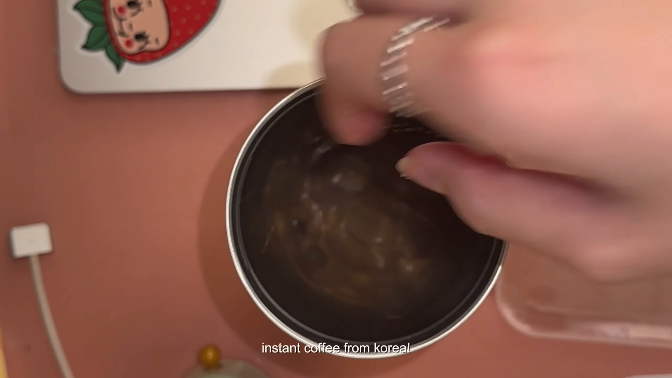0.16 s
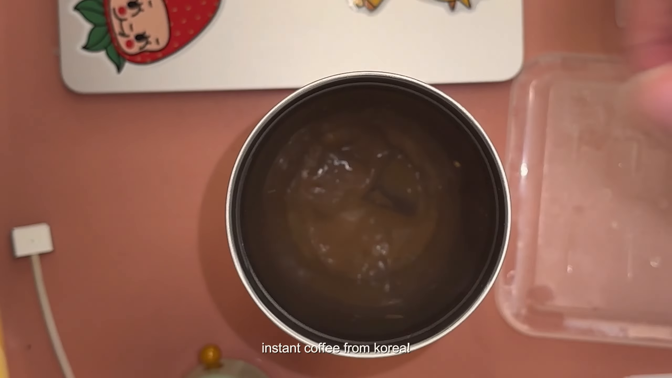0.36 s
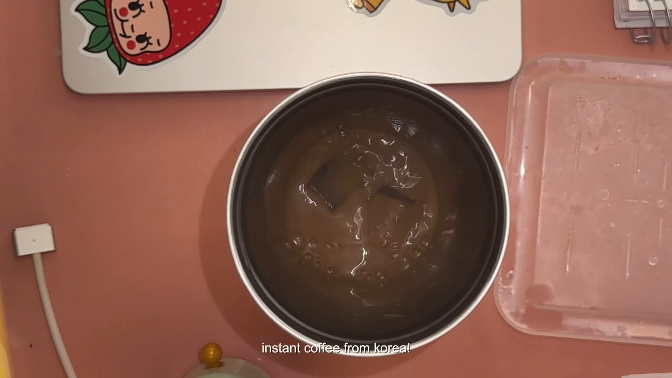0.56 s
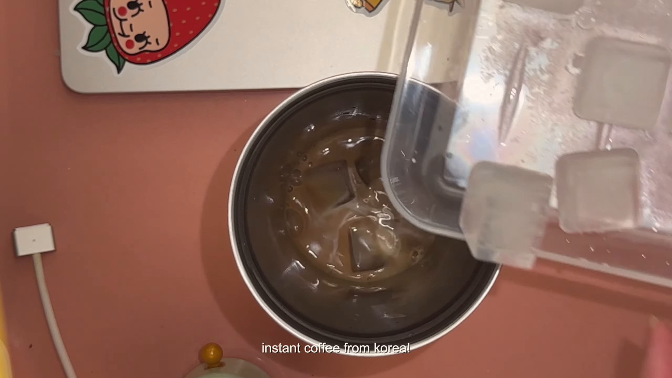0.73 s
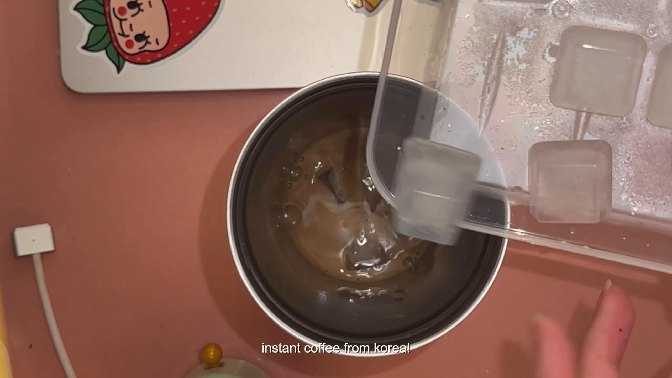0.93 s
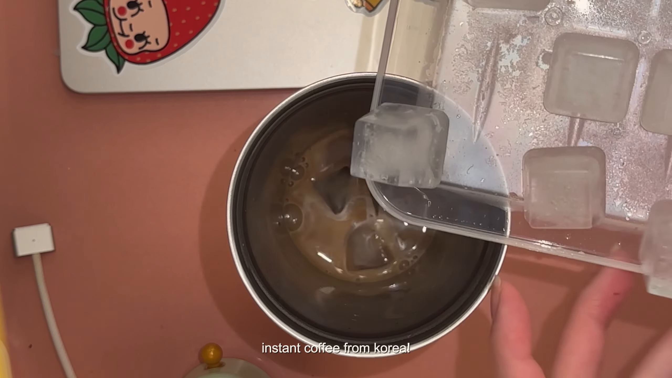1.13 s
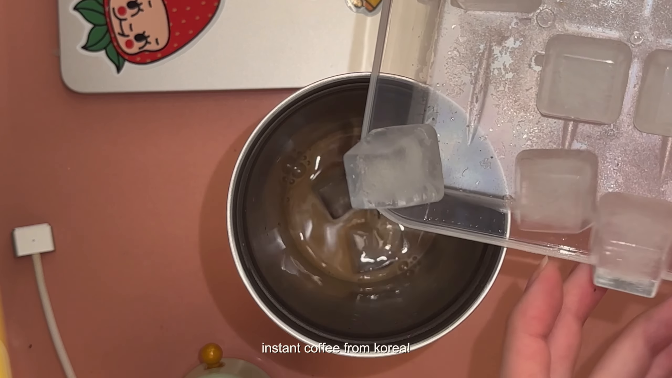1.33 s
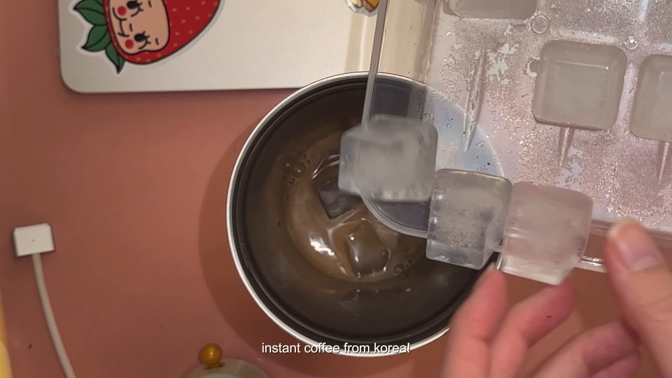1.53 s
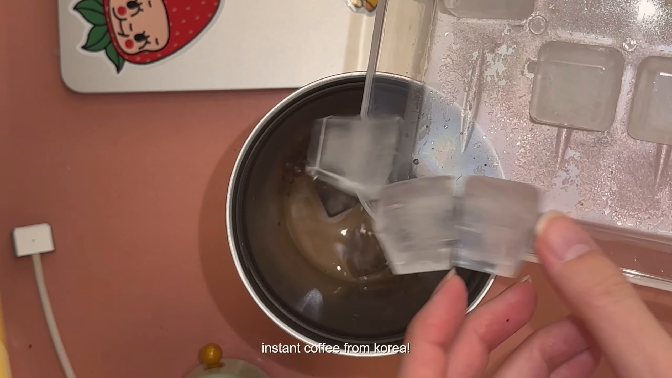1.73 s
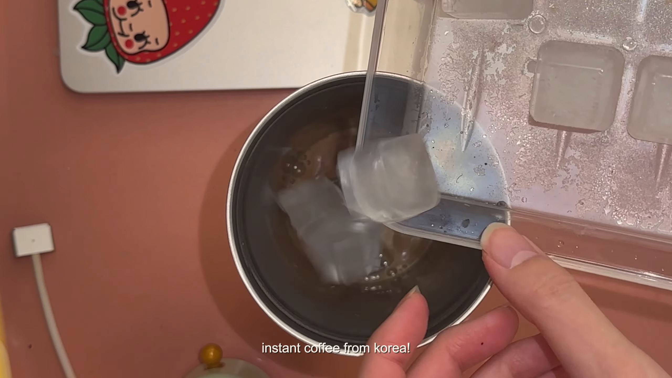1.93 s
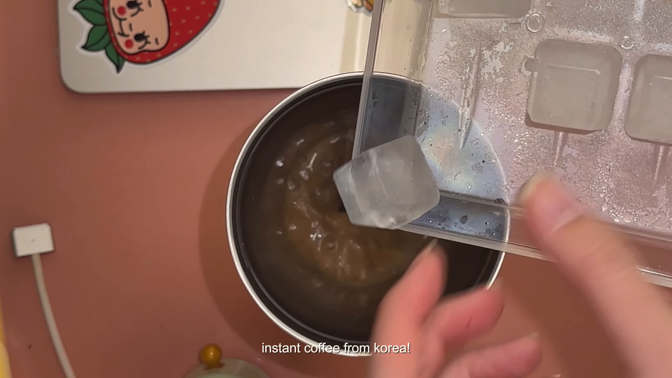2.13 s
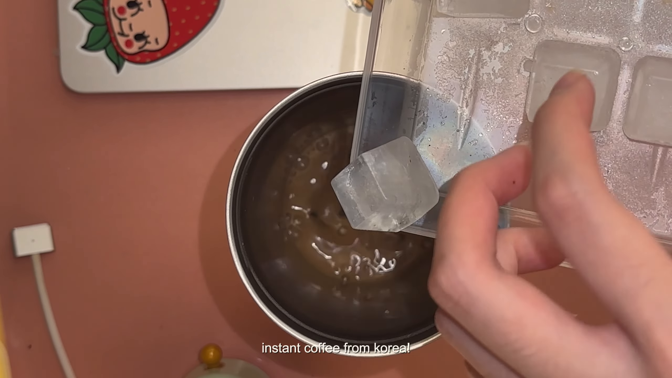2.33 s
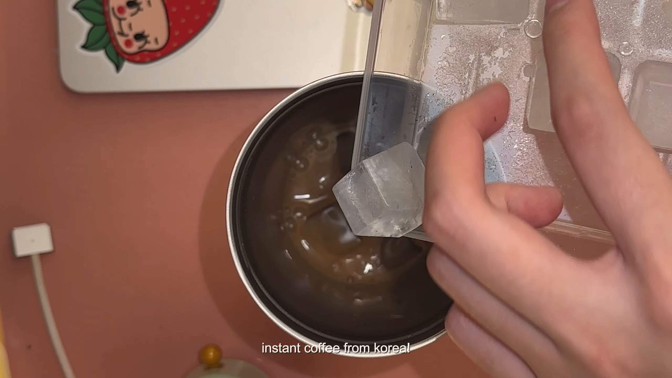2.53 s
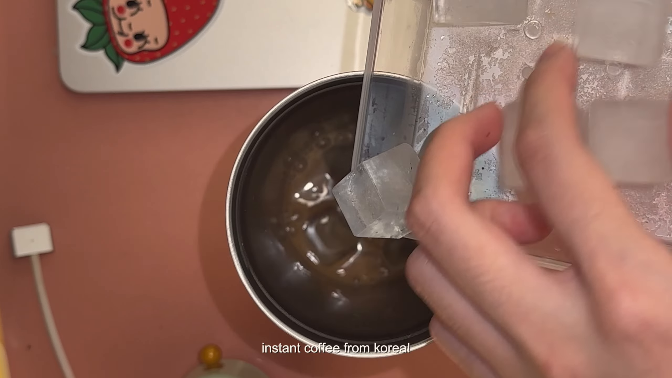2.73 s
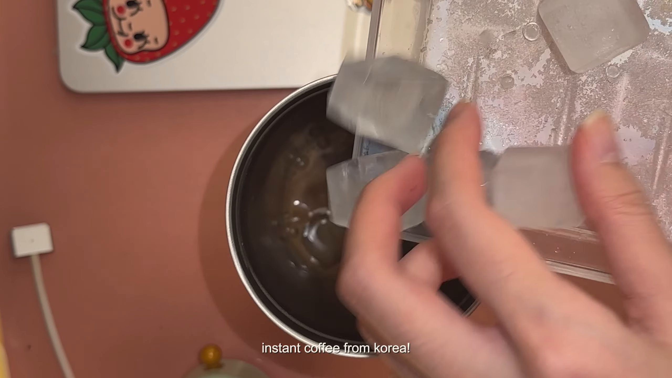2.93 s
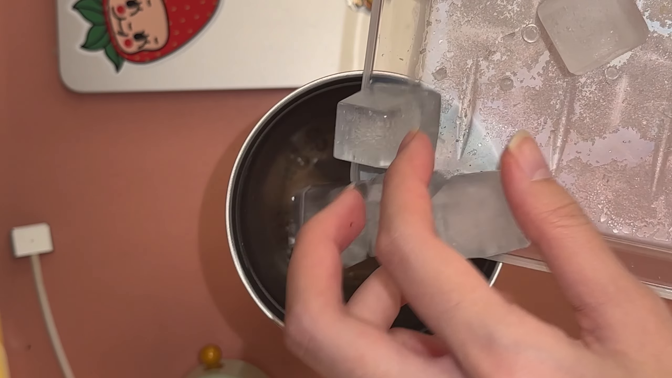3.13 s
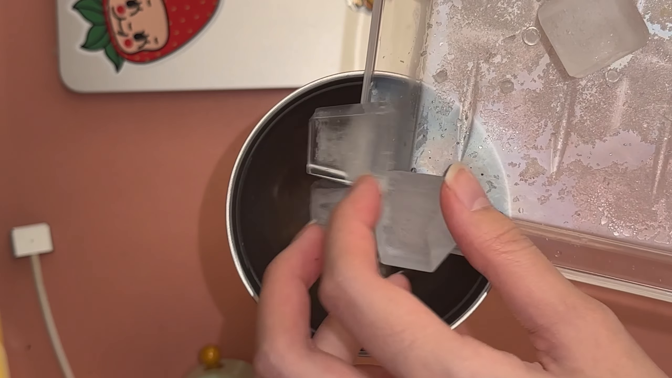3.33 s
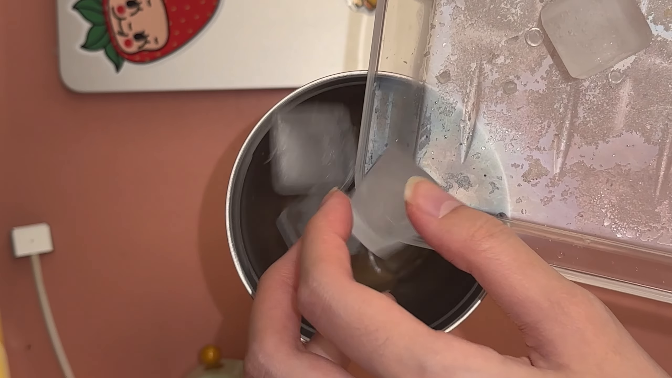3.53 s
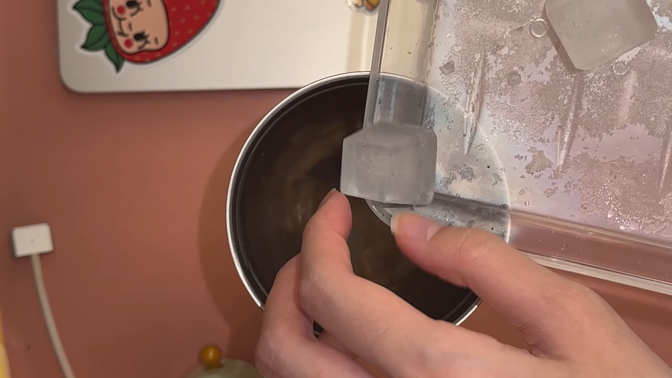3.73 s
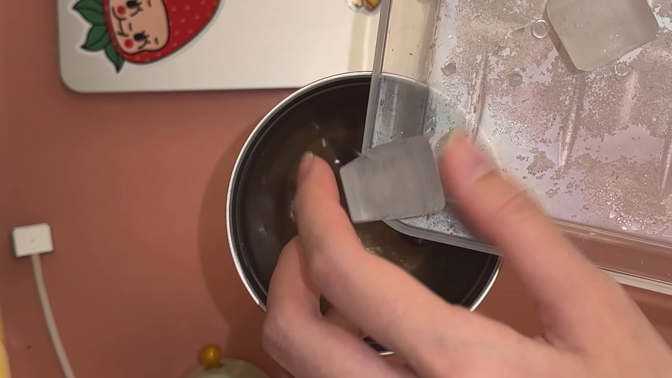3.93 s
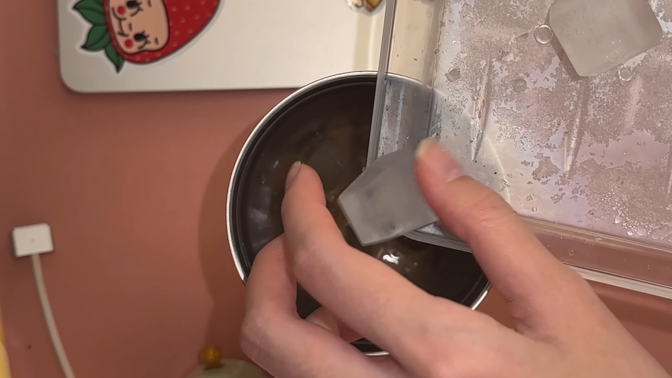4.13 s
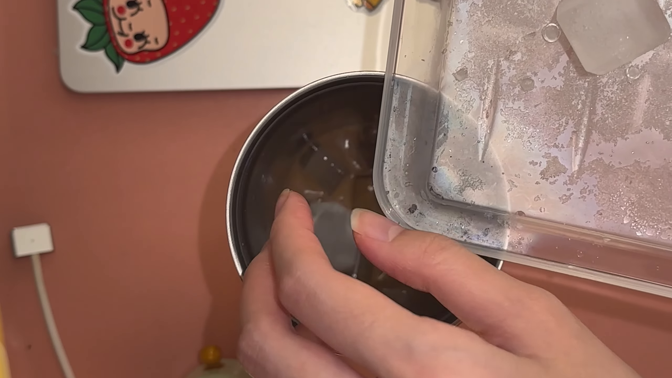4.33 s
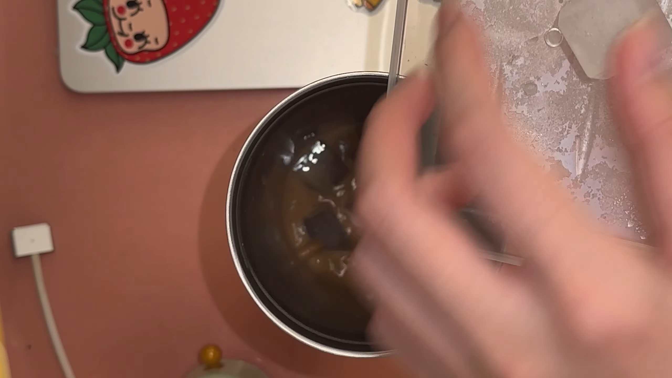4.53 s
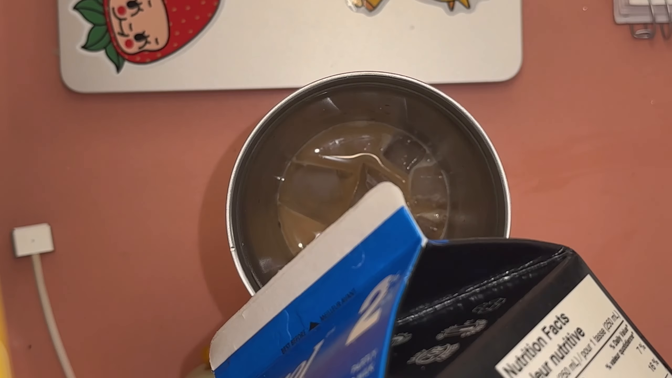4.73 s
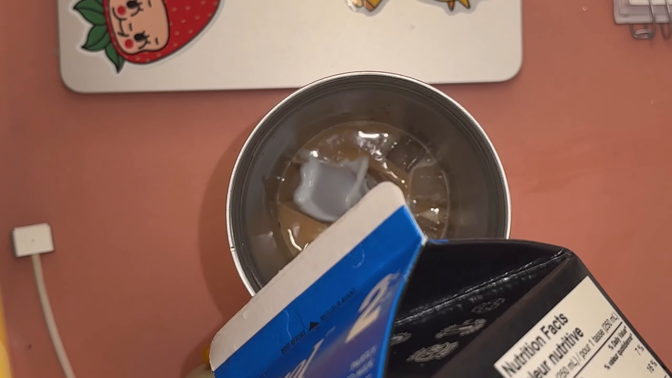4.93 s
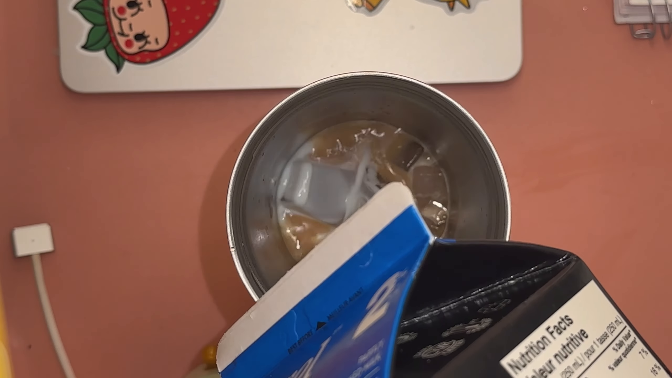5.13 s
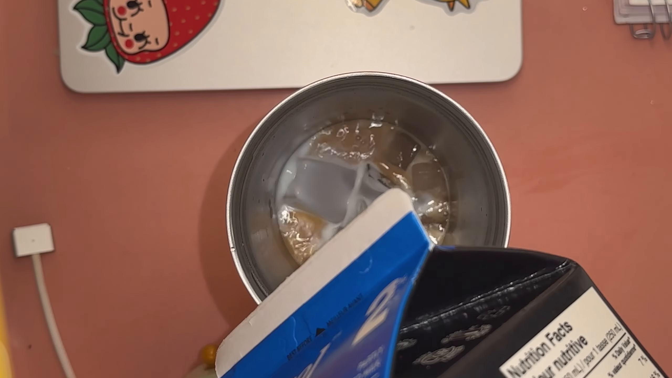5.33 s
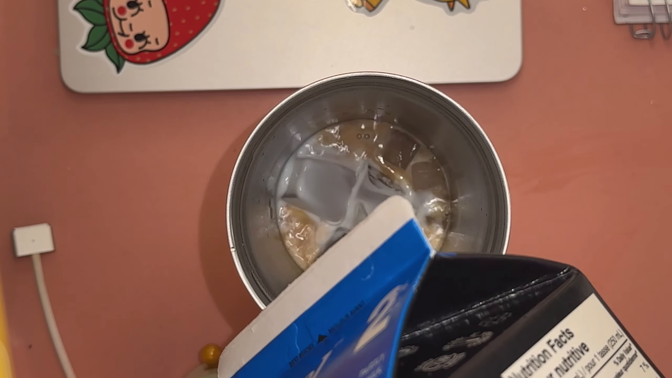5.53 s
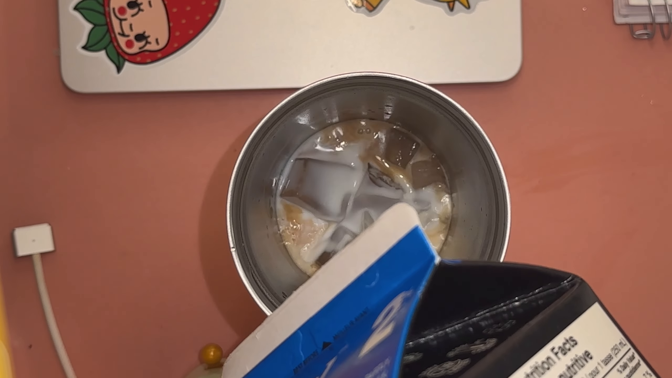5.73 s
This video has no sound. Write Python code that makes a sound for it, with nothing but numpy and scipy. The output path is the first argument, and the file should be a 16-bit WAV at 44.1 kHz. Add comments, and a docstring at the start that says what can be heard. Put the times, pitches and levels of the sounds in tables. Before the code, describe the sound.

Ice cubes knock and scrape in a plastic tray, then plop and clink into coffee in a metal cup before milk quietly runs in.

```python
"""In a small kitchen, close up, ice cubes slide and knock in a plastic tray and plop into coffee in a metal cup.
Bursts of filtered noise make the knocks and cracks; fading sine waves make the cup ring.
Trapped air sings in short gliding notes, and rough noise through resonances makes the ice scrape.
A finger pushes the ice for a while. Later milk runs in quietly as low, uneven noise.
Now and then the warming ice ticks, and a low mains hum lies beneath it all."""
import sys
import numpy as np
from scipy import signal
from scipy.fft import rfft, irfft, next_fast_len
from scipy.io import wavfile
from scipy.ndimage import map_coordinates

SR = 44100
rng = np.random.default_rng(int(sys.argv[2]) if len(sys.argv) > 2 else 0)


def transcribe(u):
    """Save the signal u as a 16-bit wav file named by the first command-line argument.

    u: samples, shape (n,) or (channels, n), limited to [-1, 1]; the rate is SR.
    q: integer samples, one column per channel.
    """
    v = np.clip(np.atleast_2d(u).T, -1, 1)
    q = np.round(v * 32767).astype(np.int16)
    wavfile.write(sys.argv[1], SR, q)


N = 254898
TIME = np.arange(N) / SR

# All levels are starting points: the functions add their own trims.
# cubes knocking in the tray: (time [s], level [dB], treble against it [dB], bass against it [dB])
TRAY_KNOCKS = [(0.803, -22, -10, -13.5), (0.808, -28.5, -30.5, -6.5), (0.834, -31.5, -14, -13.5),
               (0.863, -38, -15, -22), (0.966, -29.5, -11, -14.5), (0.979, -36, -17, -25),
               (1.004, -37, -14, -17), (1.021, -36, -16.5, -10), (1.097, -40.5, -27, -24),
               (1.122, -44.5, -10.5, -34), (1.239, -41, -10.5, -8.5), (1.322, -33.5, -17.5, -20.5),
               (1.368, -39, -13.5, -26), (1.408, -32.5, -22, -31), (1.436, -26, -14.5, -20),
               (1.46, -23, -9, -18.5), (1.482, -31.5, -15, -19), (1.503, -21, -12, -21.5),
               (1.537, -28, -15.5, -12), (1.561, -34.5, -14, -24), (1.634, -32, -12, -27),
               (1.675, -29, -14.5, -12), (1.71, -26.5, -11.5, -12), (1.72, -23, -12.5, -11.5),
               (1.754, -29, -13, -11.5), (2.446, -56, -16, -13), (2.481, -33.5, -8.5, -14),
               (2.851, -31.5, -8.5, -15.5), (2.871, -19, -13, -16.5), (2.919, -24, -10, -11.5),
               (2.949, -18.5, -17, -20), (2.972, -35, -6, -25), (3.026, -20.5, -11.5, -19),
               (3.096, -33, -13, -22), (3.575, -26, -34, -18), (3.855, -27, -19, -14.5),
               (3.873, -31, -9.5, -21), (3.929, -24.5, -12.5, -18.5), (4.194, -33.5, 6, -19)]
# cubes striking the cup and floating ice:
# (time [s], level [dB], treble against it [dB], pitch [Hz], ring against it [dB])
CUP_CLINKS = [(0.0144, -31, -40, 2440, -12.5), (0.0423, -32.5, -15, 1390, -14.5),
              (0.1094, -38, -5, 1780, -5), (0.135, -23.5, -10, 1720, -9), (0.1404, -14, -22, 1950, -18),
              (0.1564, -19.5, -54, 1460, -13.5), (0.3267, -35.5, -22.5, 1480, -9),
              (0.3576, -29.5, -26, 1417, -10), (1.7948, -16.5, -13.5, 1640, -10),
              (1.9415, -17.5, -14, 1520, -10.5), (1.9709, -14, -10, 1750, -14.5),
              (2.0014, -17, -12.5, 1520, -7), (2.0198, -23, -21, 1570, -39.5), (2.0916, -33, -30, 1210, 1),
              (2.1904, -29, -22.5, 1612, -10), (2.2573, -30, -16, 2530, -11),
              (3.2266, -32.5, -31, 1670, 5.5), (3.3054, -14, -15, 3750, -13.5),
              (3.3318, -20.5, -13, 2400, -10), (3.3874, -30.5, -10.5, 1610, -17),
              (3.4401, -30.5, -19.5, 2660, -5), (3.4795, -33, -17, 1767, -4), (3.5354, -16, -16, 2330, -10),
              (3.6386, -15.5, -13, 3600, -12.5), (3.6681, -14.5, -13, 2800, -16.5),
              (3.69, -14, -11.5, 2630, -8.5), (3.7888, -29, -17.5, 1660, -6.5),
              (4.0482, -38, -15, 3060, -20.5), (4.2966, -33, -14, 1560, -5.5),
              (4.348, -16, -9.5, 3020, -12.5), (4.3674, -20.5, -17, 2970, -34),
              (4.3954, -23.5, -19.5, 2920, -9), (4.4717, -35.5, -22, 3220, -5.5),
              (4.4884, -36, -34, 1600, -9.5), (4.6059, -38, -31, 3070, -12),
              (4.6294, -38.5, -17.5, 3050, -24)]
# ice splitting as it warms: (time [s], level [dB], pitch [Hz])
ICE_TICKS = [(0.692, -52.5, 10020), (4.197, -19.5, 6740), (4.736, -52, 10400), (4.774, -46, 6680),
             (5.1991, -29, 5070), (5.465, -47.5, 5240), (5.5175, -37.5, 10900), (5.6097, -38, 3480)]
# soft thuds through the table as cubes land: (time [s], peak [dB])
TABLE_THUDS = [(0.816, -46), (0.976, -52.5), (1.804, -47), (1.964, -38), (2.891, -44.5), (3.311, -48),
               (3.548, -51), (3.691, -44), (4.378, -50.5)]
# small blips of the milk stream: (time [s], level [dB])
MILK_BLIPS = [(5.033, -39.5), (5.222, -38.5), (5.432, -40.5)]
# ringing notes of the cup's wall when empty: (pitch [Hz], level [dB], time to fall 60 dB [s])
CUP_MODES = [(708, -6.5, 1), (794, -7.5, 0.96), (1082, -4, 0.36), (1111, -15.5, 1), (1497, -11, 0.13),
             (1580, -6.5, 0.53), (1687, 7, 0.19), (1884, -2.5, 0.28), (2220, -13.5, 0.29),
             (2317, 4.5, 0.19), (2380, -16.5, 0.13), (2730, -3, 0.19), (2826, -2, 0.12), (3140, -13, 0.25),
             (3630, -9, 0.2), (3800, -17, 0.24), (4480, 3, 0.085), (4830, -26, 0.34), (6100, -22, .26),
             (6800, -26.5, 0.14)]
# resonances of the tray: (pitch [Hz], width [Hz], level [dB])
TRAY_MODES = [(398, 42.8, -14), (1104, 150, 23), (1600, 830, 16), (2860, 620, 19), (4040, 80, -24.5),
              (5210, 108, -50), (5950, 100, -1.5), (7600, 314, 8.5)]
# colour of a knock on plastic: (frequency [Hz], relative level [dB])
PLASTIC_COLOUR = [(88, -38), (150, -20.5), (494, -5), (545, -2.5), (774, -6), (1080, -2), (1450, -1.5),
                  (1600, 2.5), (2360, -5), (2760, -1), (3550, -8.5), (8400, -17.5), (16000, -28.5)]
# colour of an ice crack: (frequency [Hz], relative level [dB])
ICE_COLOUR = [(280, -43.5), (480, -8.5), (644, 6), (985, -18), (1770, -6), (2080, -23), (2270, -11),
              (2750, -6), (3000, -7), (10600, -23), (16000, -39.5)]
# colour of frosty scraping: (frequency [Hz], relative level [dB])
GRIT_COLOUR = [(350, -56.5), (600, -42.5), (688, 5), (812, -10.5), (1080, 8.5), (1510, -10.5),
               (2680, -11.5), (4400, -12), (5950, -11.5), (6550, -11.5), (10500, -15), (14500, -22),
               (16000, -27)]
# colour of the flexing tray: (frequency [Hz], relative level [dB])
FLEX_COLOUR = [(76, -66.5), (130, -28), (205, -8), (247, -13.5), (387, 5), (591, -13), (700, -18.5),
               (910, -23), (1540, -120)]
# colour of the still room air: (frequency [Hz], relative level [dB])
STILL_AIR_COLOUR = [(15, -26.5), (25, -31), (74, -4.5), (489, -26.5), (641, -23), (775, -25), (863, -34),
                    (1100, -18.5), (1230, -40.5), (1520, -23), (2050, -29), (10100, -37.5), (16000, -76.5)]
# colour of the milk's hiss: (frequency [Hz], relative level [dB])
STREAM_COLOUR = [(180, -37), (300, 0.5), (412, -17), (470, -13.5), (856, -25), (961, -21.5), (1120, -22),
                 (1660, -18.5), (2400, -20), (2930, -13), (4370, -15.5), (5430, -16.5), (16000, -57)]
# colour of the milk's low churning: (frequency [Hz], relative level [dB])
RUMBLE_COLOUR = [(40, -32), (75, -3), (105, 8), (145, 2.5), (190, -8), (280, -13.5), (450, -33), (900, -62)]
# dull bump of a landing cube: (frequency [Hz], relative level [dB])
BUMP_COLOUR = [(70, -23.5), (150, 4.5), (230, -4.5), (450, -8.5), (900, -33.5)]
# cubes sliding on their own, one list per slide: (time [s], scraping [dB], tray body [dB])
SLIDES = [
    [(0.82, -77, -73), (0.848, -64.5, -84), (0.928, -74.5, -72), (0.966, -62.5, -68), (1.082, -67, -69.5),
     (1.17, -94, -88)],
    [(1.2, -69.5, -78), (1.34, -72.5, -83), (1.524, -68.5, -81), (1.648, -70, -69.5), (1.878, -51, -54.5),
     (1.94, -60, -69)],
    [(2.87, -77, -68), (2.964, -70, -66), (3.1, -74, -68)],
    [(3.1, -60.5, -62), (3.206, -50.5, -51), (3.334, -60.5, -76.5), (3.5, -76, -72)],
    [(3.53, -52, -53), (3.62, -62, -62), (3.748, -57.5, -67), (3.8, -71, -71)],
    [(3.8, -77, -71), (3.844, -65.5, -62), (3.96, -69, -57), (4.002, -77.5, -83), (4.214, -66.5, -69),
     (4.28, -84, -73.5)],
]
# cubes pushed by a finger, one list per push: (time [s], scraping [dB], tray body [dB])
PUSHES = [
    [(2.31, -70, -45), (2.316, -46.5, -60), (2.348, -56.5, -41), (2.368, -56, -58), (2.398, -56, -49.5),
     (2.42, -70, -71)],
    [(2.445, -52, -50), (2.479, -51.5, -49), (2.597, -57, -62.5), (2.635, -44.5, -51), (2.693, -44, -49),
     (2.845, -54.5, -61.5)],
]
# milk running in: (time [s], churning [dB])
POUR = [(4.66, -48.5), (4.74, -58), (4.784, -52), (5.192, -58), (5.22, -54), (5.78, -62.5)]
# mains hum: (time [s], level [dB])
HUM = [(0, -54.5), (0.25, -73), (0.4, -64), (4.62, -64), (4.66, -52.5), (5.78, -52.5)]
# how long the room answers: (frequency [Hz], time to fall 60 dB [s])
ROOM_DECAY = [(200, 0.38), (1200, 0.28), (5000, 0.19), (14000, 0.21)]
# edges of the bass, body, treble and air bands: (frequency [Hz])
BAND_EDGES_HZ = [150, 1000, 4000, 9000, 17000]
# how full the cup is: (time [s], fill [0-1])
FILL = [(1.9, 0.15), (2.0, 0.64), (3.25, 0.58), (3.35, 1), (4.35, 0.88)]
# hollows that plunging cubes open in the drink: (time [s], start pitch [Hz], level [dB])
GULPS = [(0.141, 750, -19.5), (1.939, 633, -22), (2.001, 575, -28), (3.306, 630, -31), (3.643, 616.6, -30),
         (4.344, 587, -24)]
# short gliding notes of trapped air, and first one brief low ring of the cup:
# (time [s], start pitch [Hz], pitch ratio over one glide [x], level [dB])
GLIDING_NOTES = [(0.014, 728, 0.89, -37), (0.04, 1235, 1.3, -44.5), (0.12, 770, 1.2, -33.5),
                 (0.146, 1140, 1.39, -23), (0.161, 1494, 1.084, -17), (0.358, 1388, 1.14, -38),
                 (1.975, 1833, 0.94, -23), (2.014, 1597, .91, -25), (2.084, 1082, 1.5, -37.5),
                 (3.343, 1526, 1.18, -33), (3.712, 1470, 1.21, -32)]
# brief hum of the tray's wall: (pitch [Hz], level against the knock [dB], time to fall 60 dB [s])
WALL_NOTE = (1075, -11.5, 0.055)

# a cube lands on a corner, then tips more softly onto its face: (delay [s], level change [dB])
TIP_IN_TRAY, TIP_IN_CUP = (0.0062, -17.5), (0.011, -13.5)
GULP_GLIDE, SPRAY_GLIDE = 1.04, 1.25  # pitch ratio over one glide
SPRAY_CYCLES = 31  # glide time of a tiny bubble, in cycles of its start pitch
# a cube bobs back up: delay [s], pitch ratio, level against the plunge [dB], extra in a full cup [dB]
BOB_S, BOB_PITCH, BOB_DB, BOB_FULL_DB = 0.082, 0.96, -29.5, 13.5
AIR_GLIDE_S, AIR_GLIDE_FULL_S = 0.016, 0.042  # glide time of a note, and extra in a full cup
SLIDE_DB, PUSH_DB = 7, 8  # trim of the scraping
SLIDE_FLEX_DB, PUSH_FLEX_DB = 2.5, 1  # trim of the tray body
TOP_HZ = 16200


def amp(db):
    """Turn decibels into a gain."""
    return 10 ** (np.asarray(db) / 20)


def unit(x):
    """Scale a sound to an average (rms) strength of 1."""
    return x / np.sqrt(np.mean(x ** 2) + 1e-20)


def along(points, hz):
    """Read (Hz, value) points on a log frequency axis."""
    f, v = np.transpose(points)
    return np.interp(np.log(hz + 1), np.log(f + 1), v)


def curves(rows):
    """Draw lines through each column after the time, one value per sample."""
    s, *cols = np.transpose(rows)
    return [np.interp(TIME, s, c) for c in cols]


def between(start, end, fade):
    """Open a gate from start to end, with soft edges outside."""
    return np.clip(np.minimum(TIME - start, end - TIME) / fade + 1, 0, 1)


def wobble(rate, size=N):
    """Draw a smooth random curve through rate random points a second."""
    points = rng.standard_normal(int(size * rate / SR) + 4)
    return map_coordinates(points, [np.arange(size) * rate / SR])


def filtered(x, response):
    """Filter x by a gain that depends on frequency."""
    m = next_fast_len(len(x) + 4096)
    hz = np.fft.rfftfreq(m, 1 / SR)
    return irfft(rfft(x, m) * response(hz), m)[:len(x)]


def noise(spectrum, size=N):
    """Make coloured noise of rms 1."""
    return unit(filtered(rng.standard_normal(size), lambda hz: amp(along(spectrum, hz))))


def add(track, s, sound):
    """Mix a sound into the track at time s."""
    part = track[max(round(s * SR), 0):][:len(sound)]
    part += sound[:len(part)]


def swell(u):
    """Rise to 1 at u = 1, then die away."""
    return u * np.exp(1 - u)


def favour(hz, pitch_hz, octaves):
    """Give 1 at the pitch that a contact excites best, and near 0 far from it."""
    return 1 / (1 + (np.log2((hz + 1) / pitch_hz) / octaves) ** 2)


def fill_at(s):
    """How full the cup is at time s."""
    return np.clip(np.interp(s, *np.transpose(FILL)), 0, 1)


def landing(s, db, tip):
    """The two contacts of one blow, corner then face: (time [s], level [dB])."""
    delay, change_db = tip
    return [(s, db), (s + delay * rng.uniform(0.7, 1.3), db + change_db)]


def contact(spectrum, pitch_hz, band_db, band_t60, tail_db, tail_t60, rise, pitch_db=8):
    """One hard contact: a pitched crack whose bands die at their own speeds, plus a weak shudder."""
    t = np.arange(SR // 6) / SR
    burst = noise(spectrum, size=len(t))
    out = np.zeros(len(t))
    for lo, hi, db, t60 in zip(BAND_EDGES_HZ, BAND_EDGES_HZ[1:], band_db, band_t60):
        def band_gain(hz):
            return (hz >= lo) * (hz < hi) * amp(pitch_db * favour(hz, pitch_hz, octaves=0.12))

        band = filtered(burst, band_gain)
        band /= np.std(band[:SR // 200])  # even strength over the first 5 ms
        crack = amp(-60 * t / t60)
        shudder = amp(tail_db - 60 * t / tail_t60)
        out += amp(db) * band * (crack + shudder)
    # each contact rises softly within about a millisecond
    return out * (1 - np.exp(-t / rise))


def background(hum_hz=59.6, floor_db=-71, drone_db=-69):
    """Mains hum as a slightly unsteady sine, a low drone and still air as coloured noise."""
    hum = np.sin(2 * np.pi * hum_hz * TIME + 0.12 * wobble(5))
    drone = noise([(60, -41.5), (100, 6.0), (118, 4.0), (150, -3.5), (220, -12.5), (400, -60.0)])
    hum_db, = curves(HUM)
    return amp(hum_db) * unit(hum) + amp(drone_db) * drone + amp(floor_db) * noise(STILL_AIR_COLOUR)


def kitchen(x):
    """The room's short answer: fading noise in which the low sounds last longest."""
    hz, t, z = signal.stft(rng.standard_normal(SR // 2), SR, nperseg=256)
    fade = amp(-60 * t / along(ROOM_DECAY, hz)[:, None])
    tail = signal.istft(z * fade, SR, nperseg=256)[1]
    tail = np.pad(tail / np.linalg.norm(tail), (SR // 200, 0))  # arrives 5 ms late
    return signal.fftconvolve(x, tail)[:N]


def thuds(table_hz=99, rise=0.024):
    """The table answers heavy landings with a short low note."""
    out, t = np.zeros(N), np.arange(SR // 4) / SR
    for s, db in TABLE_THUDS:
        note = np.sin(2 * np.pi * table_hz * rng.normal(1, 0.046) * t)
        add(out, s, amp(db) * swell(t / rise) ** 2 * note)
    return out


def bumps(below_db=-33, rise=0.0053):
    """The weight of each cube striking the cup passes into the table as a dull bump."""
    out, t = np.zeros(N), np.arange(SR // 8) / SR
    for s, db, *_ in CUP_CLINKS:
        add(out, s, amp(db + below_db) * swell(t / rise) * noise(BUMP_COLOUR, size=len(t)))
    return out


def ice_ticks(t60=0.015, width=0.072):
    """Warming ice splits with tiny bright ticks: narrow noise that dies at once."""
    out, t = np.zeros(N), np.arange(SR // 20) / SR
    for s, db, hz in ICE_TICKS:
        def focus(f):
            peak = 1 / np.hypot(width, np.log((f + 1) / hz))
            return (f / (f + hz)) ** 2 * peak / (1 + (f / 12000) ** 6)

        tick = unit(filtered(rng.standard_normal(len(t)), focus))
        add(out, s, amp(db - 3.5 - 60 * t / t60) * tick)
    return out


def milk(blip_hz=1050, hiss_db=-70.0):
    """A smooth stream runs down between the cubes: low churning, faint hiss and a few blips."""
    churn_db, = curves(POUR)
    out = amp(churn_db - 0.2 + 1.7 * wobble(12)) * noise(RUMBLE_COLOUR) + amp(hiss_db) * noise(STREAM_COLOUR)
    out *= between(POUR[0][0], TIME[-1], fade=0.03)
    t = np.arange(SR // 20) / SR
    colour = [(600, -35), (blip_hz * 0.78, -2), (blip_hz, 0), (1400, -9), (1900, -6), (2600, -14), (3500, -35)]
    for s, db in MILK_BLIPS:
        add(out, s, amp(db - 8.5) * swell(t / 0.0032) * noise(colour, size=len(t)))
    return out


def slips(rate, spread_db, smooth):
    """Friction force: dense little slips of uneven size on a smooth rub."""
    size = rng.standard_normal(N) * amp(spread_db * np.minimum(rng.exponential(size=N), 3))
    jerks = unit((rng.random(N) < rate / SR) * size)
    return unit(jerks + smooth * rng.standard_normal(N))


def tray_response(f):
    """How strongly the tray's resonances, with alternating signs, answer each frequency."""
    total = 0
    for k, (centre, width, db) in enumerate(TRAY_MODES):
        resonance = 1j * f * width / (centre * centre - f * f + 1j * f * width)
        total = total + (-1) ** k * amp(db) * resonance
    return total * f / (f + 600)  # less bass


def tray_slides(grain_rate=1300, spread_db=4, smooth=0.87, body_db=-2, catch_rate=60, catch_size=19):
    """Frosty ice scrapes over plastic: little slips and rarer catches shake the tray's resonances."""
    grit_level, body_level = np.zeros(N), np.zeros(N)
    for strokes, grit_db, flex_db in ((SLIDES, SLIDE_DB, SLIDE_FLEX_DB), (PUSHES, PUSH_DB, PUSH_FLEX_DB)):
        for rows in strokes:
            scrape_db, shell_db = curves(rows)
            gate = between(rows[0][0], rows[-1][0], fade=0.002)
            grit_level += gate * amp(grit_db + scrape_db)
            body_level += gate * amp(flex_db + shell_db)
    # coarse and fine bumps of the frost slip independently, each size in its own band
    force = np.zeros(N)
    for lo, hi in zip(BAND_EDGES_HZ, BAND_EDGES_HZ[1:]):
        rub = slips(grain_rate, spread_db, smooth) * amp(2.24 * wobble(90))
        force += filtered(rub, lambda hz: (hz >= lo) & (hz < hi))
    # a loose cube catches hard; under the finger it runs more evenly
    loose = 1 - 0.75 * sum(between(rows[0][0], rows[-1][0], fade=0.006) for rows in PUSHES)
    catches = (rng.random(N) < catch_rate / SR) * rng.uniform(0.65, 1, N)
    force = force + catches * catch_size * loose
    scrape = unit(filtered(force, lambda hz: amp(along(GRIT_COLOUR, hz))))
    body = unit(filtered(force, tray_response))
    flex = unit(noise(FLEX_COLOUR) * amp(3.5 * wobble(50)))
    return grit_level * unit(scrape + amp(body_db) * body) + body_level * flex


def chatter(per_s=42, over_db=4, spread_db=7, low_db=-12, treble_db=-3, air_db=-15, pitch_hz=3600):
    """A loose cube rocks from edge to edge as it slides: small taps that follow the slide's strength."""
    out = np.zeros(N)
    band_t60 = [0.083, 0.066, 0.024, 0.012]
    for rows in SLIDES:
        times, scrape_db, _ = np.transpose(rows)
        for slot in np.arange(times[0], times[-1] - 1 / per_s, 1 / per_s):
            s = slot + rng.random() / per_s
            db = np.interp(s, times, scrape_db) + SLIDE_DB + over_db + spread_db * (2 * rng.random() - 1)
            band_db = db + np.array([low_db, 0, treble_db, air_db])
            tap_hz = pitch_hz * 2 ** (rng.random() - 0.5)
            add(out, s, contact(PLASTIC_COLOUR, tap_hz, band_db, band_t60,
                                tail_db=-42, tail_t60=0.05, rise=0.00014))
    return out


def tray_knocks(low_db=1, body_db=-6, treble_db=8.5, air_db=3.0, air_grows=1.5, pitch_hz=1080):
    """Cubes bump the tray's wall and each other; plastic is dead within a few hundredths of a second."""
    out, t = np.zeros(N), np.arange(SR // 8) / SR
    band_t60 = [0.071, 0.034, 0.011, 0.016]
    note_hz, note_db, note_t60 = WALL_NOTE
    for start, level_db, treble, bass in TRAY_KNOCKS:
        colour_db = np.array([bass + low_db, body_db, treble + treble_db, air_grows * treble + air_db])
        for s, db in landing(start, level_db, TIP_IN_TRAY):
            add(out, s, contact(PLASTIC_COLOUR, pitch_hz, db + colour_db, band_t60,
                                tail_db=-25, tail_t60=0.071, rise=0.0007))
        note = np.sin(2 * np.pi * note_hz * rng.normal(1, 0.037) * t)
        add(out, start, amp(level_db + note_db - 60 * t / note_t60) * note)
    return out


def jostle(below_db=-24, tick_hz=3300, t60=0.042, lasts=0.2, count=3):
    """After each heavy blow floating cubes bob and tap each other lightly, more so in a full cup."""
    out, t = np.zeros(N), np.arange(SR // 20) / SR
    for s, db, *_ in CUP_CLINKS:
        if db > -20:
            for when, size in rng.random((count, 2)):
                pitch_hz = tick_hz * 2 ** (size - 0.5)
                tap = unit(filtered(rng.standard_normal(len(t)), lambda hz: favour(hz, pitch_hz, octaves=0.3)))
                fade = amp(db + below_db - 9.4 * when - 60 * t / t60)
                add(out, s + 0.018 + lasts * when, (0.083 + fill_at(s)) * fade * tap)
    return out


def cup_ring(fill, bright_db, pitch_hz, scatter_db=3, sink=0.17, pitch_db=7.5, octaves=0.07, damping=0.92):
    """The wall's notes fade; drink weighs down and damps the lowest most, and its sloshing bends all."""
    t = np.arange(SR * 3 // 5) / SR
    slosh = 0.0035  # share of the pitch
    out = np.zeros(len(t))
    for (hz, db, t60), (gain, detune) in zip(CUP_MODES, rng.standard_normal((len(CUP_MODES), 2))):
        loaded_hz = hz / (1 + sink * fill * (760 / hz) ** 5)
        bend = slosh * (detune + np.sin(2 * np.pi * (7 * t + rng.random())))
        level_db = db + scatter_db * gain + bright_db * max(np.log2(hz / 1400), 0)
        level_db += pitch_db * favour(hz, pitch_hz, octaves)
        wet_t60 = t60 / (1 + damping * fill * (1000 / hz) ** 2)
        note = np.sin(2 * np.pi * loaded_hz * np.cumsum(1 + bend) / SR)
        out += amp(level_db - 60 * t / wet_t60) * note
    return out * (1 - np.exp(-t / 0.0017))


def cup_clinks(hardness=0.6, dull_db=-17, low_db=-17, body_db=-6.0, treble_db=5, air_db=-8):
    """A falling cube cracks on cup or ice and rings the wall; brighter blows favour its higher notes."""
    out = np.zeros(N)
    band_t60 = [0.024, 0.024, 0.015, 0.026]
    for start, level_db, treble, pitch_hz, ring_db in CUP_CLINKS:
        colour_db = np.array([low_db, body_db, treble + treble_db, treble + air_db])
        for s, db in landing(start, level_db, TIP_IN_CUP):
            add(out, s, contact(ICE_COLOUR, pitch_hz, db + colour_db, band_t60,
                                tail_db=-16, tail_t60=0.12, rise=0.0008))
        ring = cup_ring(fill_at(start), hardness * (treble - dull_db), pitch_hz)
        add(out, start, amp(level_db + ring_db - 13) * ring)
    return out


def gliding_note(start_hz, end_hz, length, waver):
    """A short gliding sine; trapped air sings so as its pocket changes shape and rises."""
    t = np.arange(SR // 5) / SR
    glide = np.minimum(t / length, 1.4)  # runs on a little past the end pitch
    hz = (start_hz + (end_hz - start_hz) * glide) * (1 + waver * wobble(150, size=len(t)))
    soft_start = 1 - np.exp(-(t / 0.003) ** 2)
    return soft_start * swell(t / (0.24 * length)) * np.sin(2 * np.pi * np.cumsum(hz) / SR)


def plops(waver=0.014, spray_db=-19, spray_hz=2700, count=5):
    """Gulps and short gliding notes, longer in a fuller cup, each with a few tiny high notes after it."""
    out = np.zeros(N)
    plunges = [(s, hz, GULP_GLIDE, db) for s, hz, db in GULPS]
    bobs = [(s + BOB_S, hz * BOB_PITCH, GULP_GLIDE, db + BOB_DB + BOB_FULL_DB * fill_at(s)) for s, hz, db in GULPS]
    for s, start_hz, glide, db in plunges + bobs + GLIDING_NOTES:
        length = AIR_GLIDE_S + AIR_GLIDE_FULL_S * fill_at(s)
        add(out, s, amp(db) * gliding_note(start_hz, start_hz * glide, length, waver))
        for when, size in rng.random((count, 2)):
            hz = spray_hz * 4 ** (size - 0.5)
            tiny = gliding_note(hz, SPRAY_GLIDE * hz, SPRAY_CYCLES / hz, waver)
            add(out, s + 0.035 * when, amp(db + spray_db - 21 * when) * tiny)
    return out


def scene():
    """Tray, cup and milk heard close up, with a little room."""
    tray = tray_knocks() + tray_slides() + chatter()
    cup = cup_clinks() + jostle() + plops() + ice_ticks() + milk()
    near = tray + cup + thuds() + bumps()
    return (near + amp(-12.5) * kitchen(near) + background())[None]


def record(dry):
    """The microphone keeps almost nothing above its band limit."""
    return np.array([filtered(channel, lambda hz: 1 / (1 + (hz / TOP_HZ) ** 120)) for channel in dry])


dry = scene()
out = record(dry)
transcribe(out)
```